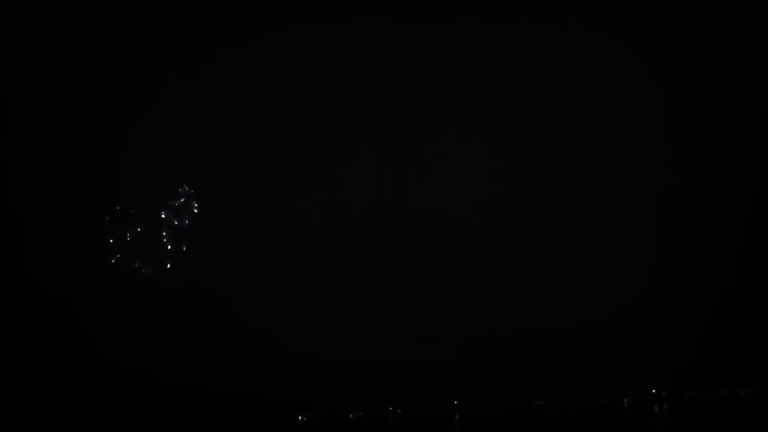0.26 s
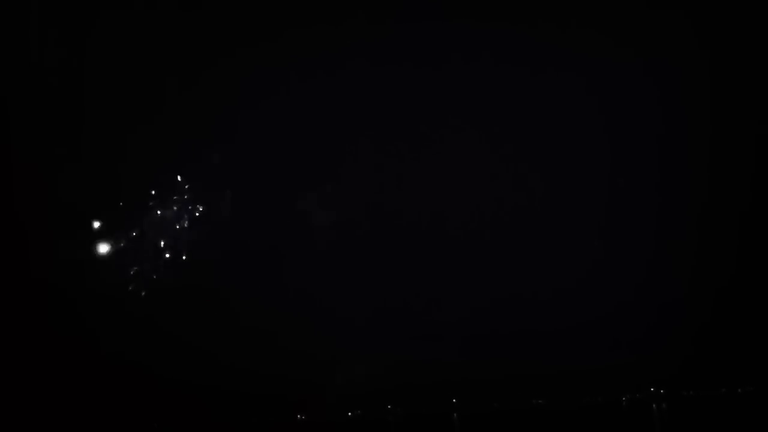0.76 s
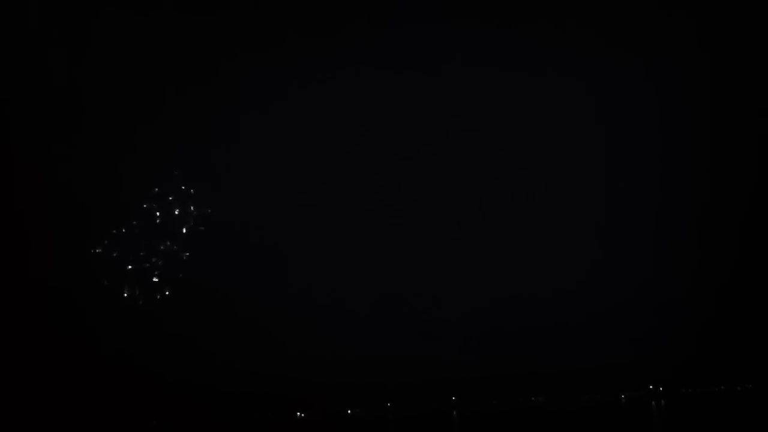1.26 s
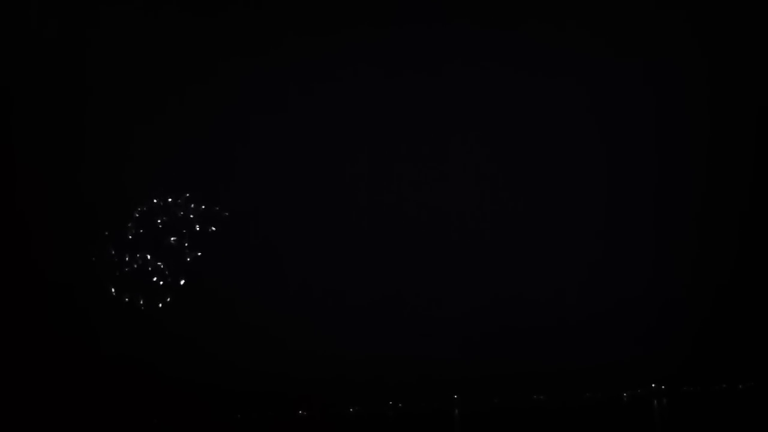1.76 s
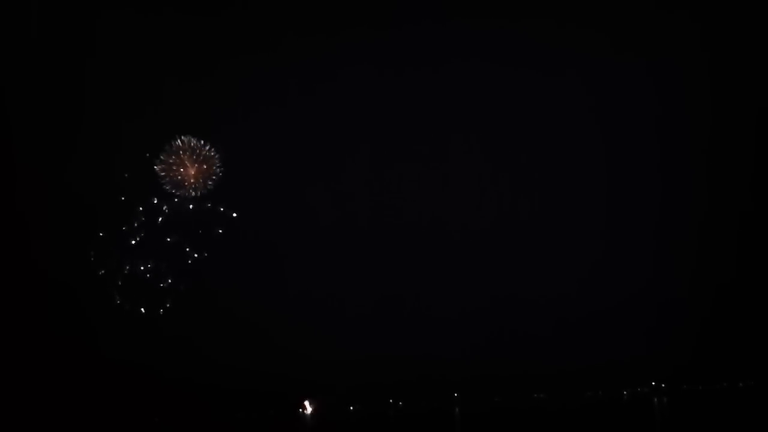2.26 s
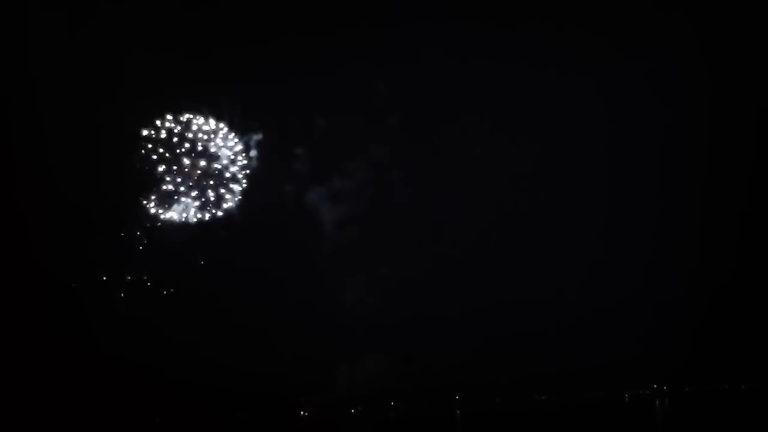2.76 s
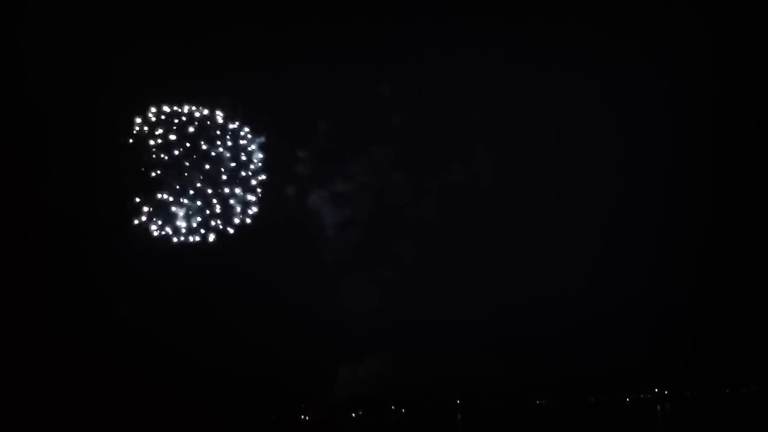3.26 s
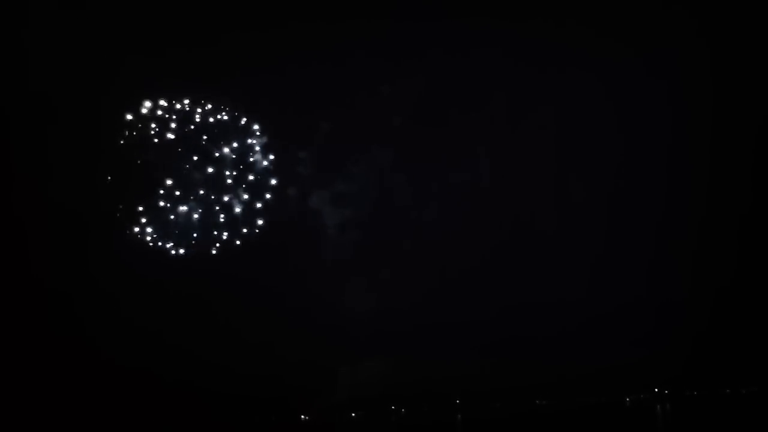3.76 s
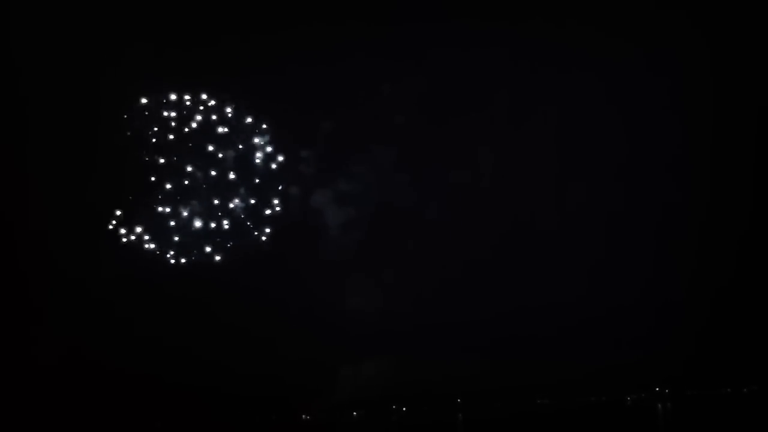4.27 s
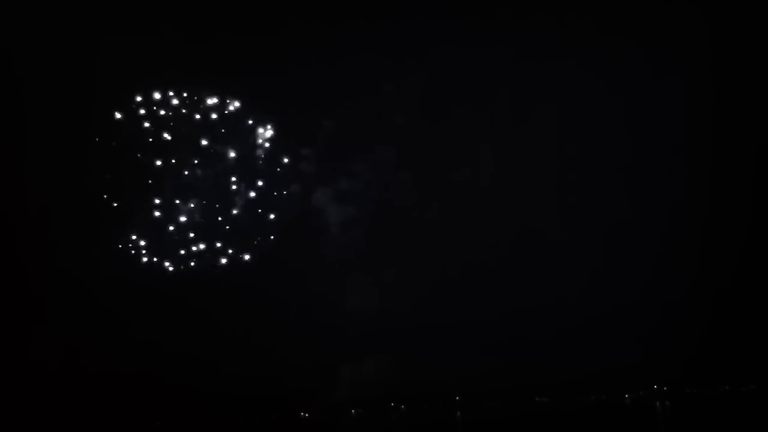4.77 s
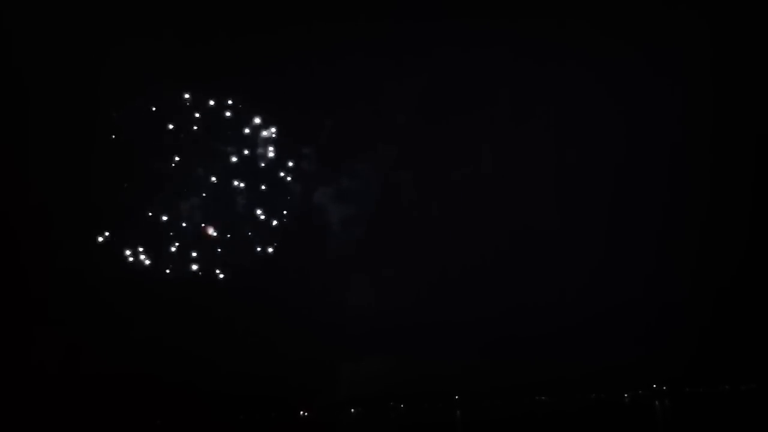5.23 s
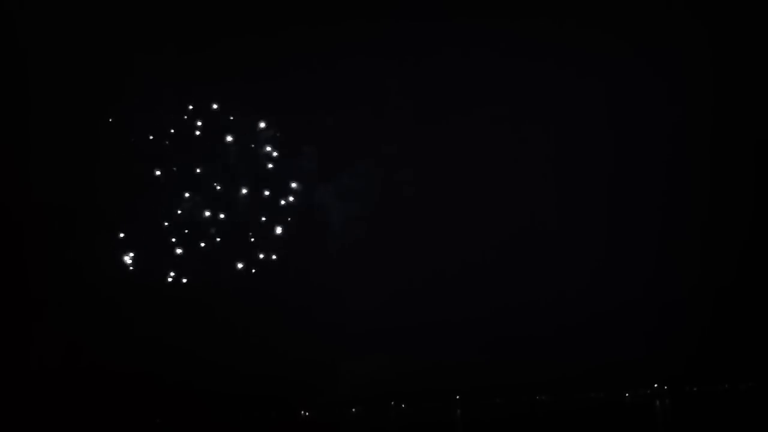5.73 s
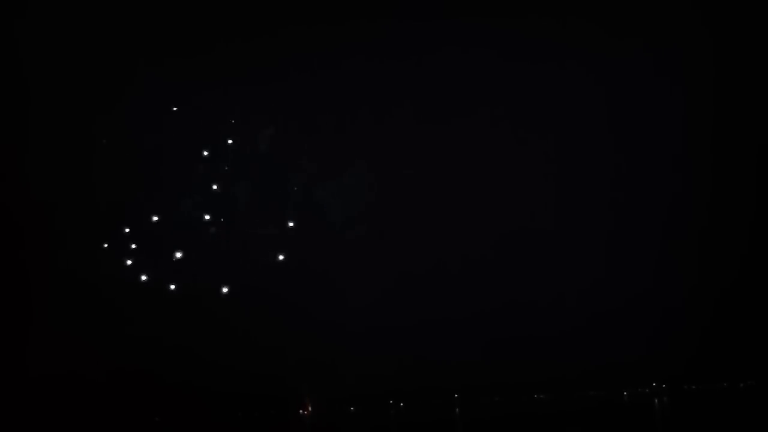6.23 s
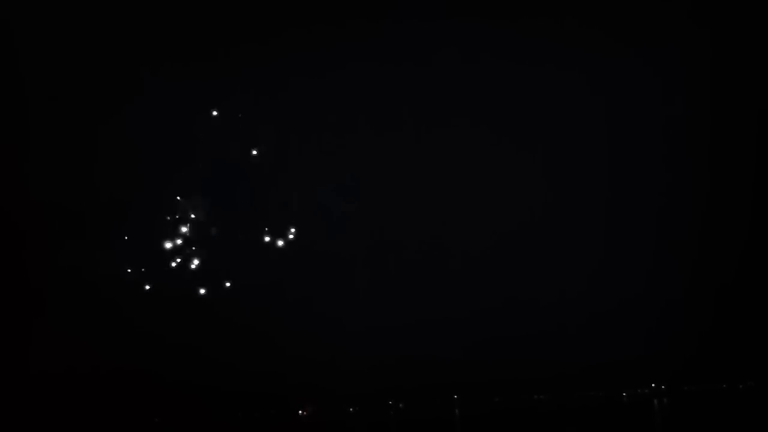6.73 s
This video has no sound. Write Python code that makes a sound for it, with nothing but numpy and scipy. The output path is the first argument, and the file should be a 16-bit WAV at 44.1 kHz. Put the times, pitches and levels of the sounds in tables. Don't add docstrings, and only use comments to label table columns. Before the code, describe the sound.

Outdoors by open water, light wind softly buffets a small stereo microphone over low far rumble and faint hiss. A deep mortar thump rolls out, followed by dry pops that bunch into a crackling flurry with grainy sizzling. Midway a thump and hard bang strike almost together and reverberate along the shore. Quiet follows with cloth brushing and small clicks, until one last muffled burst.

```python
import sys
import numpy as np
from scipy import signal
from scipy.fft import rfft, irfft, next_fast_len
from scipy.io import wavfile
from scipy.ndimage import uniform_filter1d

SR = 44100
rng = np.random.default_rng(int(sys.argv[2]) if len(sys.argv) > 2 else 0)


def linear_from_db(decibels):
    return 10 ** (np.asarray(decibels, float) / 20)


def put_to_file(sound):
    columns = np.atleast_2d(sound).T
    safe = np.clip(columns, -1, 1)
    whole_steps = np.round(safe * 32767)
    wavfile.write(sys.argv[1], SR, whole_steps.astype(np.int16))


N = 308635
T = np.arange(N) / SR


def on_log(hz, table):
    f, *columns = np.transpose(table)
    return [np.interp(np.log(hz + 1e-3), np.log(f), c) for c in columns]


def colour(x, spectrum):
    size = next_fast_len(N)
    gain = linear_from_db(on_log(np.fft.rfftfreq(size, 1 / SR), spectrum)[0])
    y = irfft(rfft(x, size) * gain, size)[..., :N]
    return y / np.sqrt(np.mean(y ** 2))


def sides(lean_db):
    return linear_from_db([[lean_db / 2], [-lean_db / 2]])


def stereo_noise(side_db, lean_db=0.):
    mid, side = rng.standard_normal((2, N))
    return (mid + linear_from_db(side_db) * side * np.array([[1], [-1]])) * sides(lean_db)


def walk(rate_hz):
    k = int(SR / rate_hz)
    held = np.repeat(rng.standard_normal(N // k + 1), k)
    return 2.6 * uniform_filter1d(uniform_filter1d(held, k), k)[:N]


def grains(hold, top):
    return np.repeat(np.minimum(rng.exponential(size=N // hold + 1), top), hold)[:N]


def swells(events, rise_db_s, fall_db_s, rest_db):
    step = 64
    t, power = T[::step], linear_from_db(rest_db) ** 2
    for s, db, hold_s, *lean_db in events:
        rise = rise_db_s * np.maximum(s - t, 0)
        fall = fall_db_s * np.maximum(t - s - hold_s, 0)
        lean = sum(lean_db) * np.array([[.5], [-.5]])
        power = power + linear_from_db(db - rise - fall + lean) ** 2
    return np.repeat(10 * np.log10(power), step, axis=1)[:, :N]


def add(out, s, sound):
    i = int(s * SR)
    out[:, i:i + sound.shape[1]] += sound[:, :N - i]


def dull(x, hz):
    a = np.exp(-2 * np.pi * hz / SR)
    return signal.lfilter([(1 - a) ** 2], [1, -2 * a, a * a], x)


def air(x, hz):
    return signal.sosfilt(signal.bessel(4, hz, fs=SR, norm="mag", output="sos"), x)


def shocks(events, returns, shape, air_hz):
    suction, refill, boom_hz, boom_db, boom_t60, swing_hz, swing_db, swing_t60 = shape
    out, t = np.zeros((2, N)), T[:SR // 8]
    boom = np.cos(2 * np.pi * boom_hz * t) * linear_from_db(boom_db - 60 * t / boom_t60)
    swing = np.sin(2 * np.pi * swing_hz * t) * linear_from_db(swing_db - 60 * t / swing_t60)
    for s, peak_db, lean_db, push_ms, *_ in events:
        r = t * 1000 / push_ms
        refilling = -suction * np.exp(-np.abs(r - 1 - suction) / refill)
        wave = np.where(r < 1 + suction, 1 - r, refilling)
        wave = air(wave + boom + swing, air_hz) * linear_from_db(peak_db)
        lean = sides(lean_db)
        add(out, s, lean * wave)
        for delay_ms, left_db, right_db, hz in returns:
            add(out, s + delay_ms / 1000, lean * linear_from_db([[left_db], [right_db]]) * dull(wave, hz))
    return out


def cracks(times, dbs, lean_db, length_s, air_hz):
    # left, right [dB]
    echo_db = [
        [-14],
        [-22],
    ]
    echo_s = 0.0214
    out, t = np.zeros((2, N)), T[:400]
    tears = rng.standard_normal((len(times), 2, len(t)))
    tears = tears[:, :1] + 0.21 * tears[:, 1:] * np.array([[1], [-1]])
    tears = np.diff(tears, prepend=0) * np.exp(-t / length_s)
    tears = air(air(tears, air_hz), air_hz) * sides(lean_db)
    for s, db, tear in zip(times, dbs, tears):
        add(out, s, linear_from_db(db) * tear)
        add(out, s + echo_s, linear_from_db(db) * linear_from_db(echo_db) * tear)
    return out


def scatter(times, dbs, spectrum, side_db, lean_db, rise_s, stretch):
    # f/Hz, build-up share [1], quick t60/s, slow t60/s, slow share/dB
    bands = [(59.4, 0.76, 0.19, 0.91, -12), (258.3, 0.635, 0.15, 0.8, -7.5), (1010, 0.27, 0.24, 1, -9.5),
             (4000, 1.2, 0.29, 1, -6.5), (11840, 3.8, 0.31, 0.53, -10)]
    step = 16
    blows = np.zeros(N // step + 1)
    np.add.at(blows, (np.array(times) * SR / step).astype(int), linear_from_db(dbs) ** 2)
    size = next_fast_len(N)
    hz = np.fft.rfftfreq(size, 1 / SR)
    whole = rfft(colour(stereo_noise(side_db, lean_db), spectrum), size)

    def fade(per_s):
        return signal.lfilter([1], [1, -linear_from_db(-120 * step * per_s / SR)], blows)

    def swell(t60, rise):
        return fade(1 / t60) - 2 * fade(1 / t60 + 1 / rise) + fade(1 / t60 + 2 / rise)

    out = 0
    for k, (_, build, quick_s, slow_s, share_db) in enumerate(bands):
        part = on_log(hz, [(row[0], j == k) for j, row in enumerate(bands)])[0]
        rise = rise_s * build
        energy = swell(quick_s * stretch, rise) + linear_from_db(share_db) ** 2 * swell(slow_s * stretch, rise)
        level = uniform_filter1d(np.repeat(np.sqrt(np.abs(energy)), step), step)[:N]
        out = out + irfft(whole * part, size)[:, :N] * level * linear_from_db(walk(40))
    return out


def blasts(events, lean_db, returns, shape, spectrum, air_hz, crack_hz, crack_s, rise_s, stretch):
    events = np.insert(events, 2, lean_db, axis=1)
    s, _, _, _, scatter_db, crack_db = np.transpose(events)
    fronts = cracks(s, crack_db, 1.4, crack_s, crack_hz)
    tail = scatter(s + 0.00035, scatter_db, spectrum, -0.32, 2.7, rise_s, stretch)
    return shocks(events, returns, shape, air_hz) + fronts + tail


def wind():
    # t/s, level/dB, hold/s, left minus right/dB
    gusts = [(0.17, -53.5, 0.46, 2.5), (1.2, -51.5, 0.43, -1.5), (2.02, -50, 0.31, -1.5),
             (3.22, -50.5, 0.32, 1.5), (3.75, -57, 0.49, -1), (4.52, -53.5, 0.05, -3.5),
             (5.22, -49.5, 0.74, 0.5), (6.15, -56.5, 0.28, -4.5)]
    # f/Hz, level/dB
    spectrum = [(2, -15.5), (5, 13.5), (18, 1), (26, -10), (40, -22.5), (80, -76)]
    db = swells(gusts, rise_db_s=72, fall_db_s=53, rest_db=-60)
    return colour(stereo_noise(-3.0), spectrum) * linear_from_db(db)


def rumble():
    # t/s, level/dB, hold/s
    rolls = [(0.01, -67.5, 0.23), (0.43, -66.5, 0.11), (1.85, -68, 0.25), (4.07, -62.5, 0.15),
             (5.25, -74.5, 0.7)]
    # f/Hz, level/dB
    spectrum = [(21, -50.5), (35, -16), (48, -4), (86, -3.5), (177, -8.5), (250, -14), (275, -16),
                (907, -35), (981, -32), (1500, -51.5), (1950, -80), (3300, -120)]
    db = swells(rolls, rise_db_s=59, fall_db_s=43, rest_db=-69.5)
    return colour(stereo_noise(-3.0), spectrum) * linear_from_db(db + 2.5 + 1.0 * walk(14))


def motor_hum():
    return np.sin(2 * np.pi * 955 * T + 1.0 * walk(26)) * linear_from_db(-98 + 2.0 * walk(4.5))


def hiss():
    # f/Hz, level/dB
    spectrum = [(710, -41), (1200, -1), (1490, -3.5), (1610, -29), (4330, -4), (5210, -4.5), (6410, -15),
                (7300, -10), (16200, -13.5)]
    return colour(stereo_noise(0), spectrum) * linear_from_db(-92)


def sizzle():
    # fully alight t/s, level/dB, burn/s
    showers = [(0.01, -81, 0.11), (0.42, -72, 0.18), (0.75, -72.5, 0.72), (1.6, -71, 0.98),
               (2.78, -66.5, 0.076), (3.2, -71, 0.22), (3.62, -70.5, 0.18), (3.95, -65, 0.19),
               (4.4, -72, 0.2), (4.75, -76, 0.14), (5.3, -83, 0.38), (5.8, -80.5, 0.13), (6.55, -86.5, 0.4)]
    # f/Hz, level/dB
    spectrum = [(150, -16.5), (250, -0.5), (343, -5), (380, -0.5), (597, -6), (881, -1.5), (1360, -6),
                (1890, -6), (2230, -11.5), (2520, -11), (3770, -16), (5650, -33.5), (9000, -52.5),
                (11700, -58.5), (19800, -120)]
    crowd_db, crackle_db, crackle_per_db = -69, 5, 1.8
    db = swells(showers, rise_db_s=34.5, fall_db_s=27.5, rest_db=-96)[0]
    spread_db = np.clip(crackle_db + crackle_per_db * (crowd_db - db), 0, 3.3)
    sizes = linear_from_db(spread_db * grains(hold=60, top=3.1))
    grain = stereo_noise(-6, 3.1) * sizes / np.sqrt(uniform_filter1d(sizes ** 2, SR // 4))
    return colour(grain, spectrum) * linear_from_db(db + 1.0 + 0.3 * walk(14))


def mortars():
    # t/s, peak/dB, push/ms, scatter/dB, crack/dB
    launches = [
        (.29323, -23.5, 1.32, -41.5, -33.5),
        (3.85565, -23.5, 0.77, -51.5, -36.5),
    ]
    # delay/ms, left/dB, right/dB, dulled above f/Hz
    returns = [(11.6, -22, -24, 860), (16, -6, -8.6, 230), (24.8, -9, -10.8, 120)]
    # suction share [1], refill/push [1], boom f/Hz, dB, t60/s, after-swing f/Hz, dB, t60/s
    shape = (.89, 2.2, 95, -6.6, .095, 205, -21, .15)
    # f/Hz, level/dB
    spectrum = [(24, -39.5), (40, -23.5), (103, 2), (141, -13.5), (228, -9.5), (766, -27.5), (907, -29.5),
                (3970, -39), (9000, -54), (14000, -82)]
    return blasts(launches, 1.8, returns, shape, spectrum, air_hz=356,
                  crack_hz=3380, crack_s=0.0037, rise_s=0.17, stretch=1.03)


def rustle():
    # t/s, level/dB, hold/s, left minus right/dB
    moves = [(0.85, -94, 0.2, -2), (1.62, -88.5, 0.15, -2), (2.81, -97, 0.02, -6), (4.1, -97.5, 0.04, 1),
             (5.29, -92, 0.03, -2), (5.375, -84, 0.04, -10), (5.53, -94.5, 0.1, -2),
             (5.68, -89.5, 0.25, -4), (6.5, -95.5, 0.24, 8)]
    # f/Hz, level/dB
    spectrum = [(1200, -27), (2000, -7), (3400, -4), (5000, -5.5), (9300, -12), (11800, -15), (12800, -26),
                (16000, -48)]
    db = swells(moves, rise_db_s=116, fall_db_s=34, rest_db=-100)
    sizes = linear_from_db(3.3 * grains(hold=70, top=3.6) + 0.69 * walk(20))
    return colour(stereo_noise(-3.5) * sizes, spectrum) * linear_from_db(db + 2.5)


def ticks_and_chinks():
    # t/s, peak/dB, centre f/Hz, left minus right/dB
    ticks = [(0.7692, -67, 8130, 3.0), (0.8544, -81, 8170, 0.5), (1.0026, -63, 8240, -6),
             (1.0782, -72, 9140, 3), (1.1563, -67, 8900, -0.5), (2.3797, -61, 13500, 1),
             (3.5823, -64, 8400, 6), (4.6154, -80, 8500, 7), (4.7461, -71, 8900, 2.0),
             (5.2816, -66, 8310, -12), (5.3238, -69, 11000, -1), (5.42, -59, 8350, 0),
             (6.7532, -61, 6500, 8)]
    # t/s, peak/dB, pitch f/Hz, left minus right/dB
    chinks = [(1.0778, -62, 1400, 3), (5.029, -65, 1800, 3), (5.2095, -77, 2800, 13),
              (5.305, -64, 3550, -14), (5.797, -72, 6030, -6), (6.159, -68, 3180, -6),
              (6.193, -81, 3550, -3), (6.323, -79, 5040, -2), (6.355, -75.5, 4840, 0),
              (6.484, -77, 4670, 2), (6.7535, -73, 4380, 10), (6.9175, -62, 1500, -0.5)]
    out, t = np.zeros((2, N)), T[:500]
    for events, ring_s, spread_hz in ((ticks, 0.00025, 6000), (chinks, 0.0016, 1200)):
        envelope = np.exp(-t / ring_s) * (1 - np.exp(-t / 0.00011))
        wobbles = rng.standard_normal((len(events), len(t)))
        for (s, peak_db, hz, lean_db), wobble in zip(events, wobbles):
            blur = 1 + dull(wobble, spread_hz) * np.sqrt(SR / spread_hz) / 2
            tick = blur * np.sin(2 * np.pi * hz * t) * envelope
            add(out, s, linear_from_db(peak_db - 1.0) * sides(lean_db) * tick)
    return out


def pops():
    # t/s, peak/dB, left minus right/dB, push/ms
    stars = [(1.441, -32.5, 4, 0.51), (1.4704, -35.5, 6.5, 0.46), (1.7312, -31.5, 4.5, 0.56),
             (1.7641, -32, 3, 0.55), (2.0824, -35, 4, 0.46), (2.1277, -31.5, 3.9, 0.5),
             (2.2316, -32, 3.5, 0.64), (2.3041, -30.5, 2.5, 0.62), (2.3139, -34, 8, 0.48),
             (2.6064, -32.5, 4.1, 0.57), (2.6173, -29.5, 4, 0.58), (2.709, -33, 2, 0.56),
             (2.759, -32.5, 3.5, 0.67), (2.7813, -34.5, 7, 0.81), (2.784, -33, 3, 0.51),
             (2.7932, -34.5, 0, 0.56), (2.8063, -30.5, 5, 0.66), (2.8495, -31, 4, 0.39),
             (2.8537, -30.5, 6, 0.56), (2.858, -33, 1, 0.79), (2.8911, -29.0, 3, 0.5),
             (3.0084, -32, 4.3, 0.43), (3.0526, -33.5, 4.5, 0.5), (3.1286, -31.5, 3, 0.63)]
    # delay/ms, left/dB, right/dB, dulled above f/Hz
    returns = [(1.05, -11, -20, 6000), (1.87, -1.1, -2.9, 380)]
    # suction share [1], refill/push [1], boom f/Hz, dB, t60/s, after-swing f/Hz, dB, t60/s
    shape = (.58, .66, 100, -80, .05, 300, -80, .05)
    # f/Hz, level/dB
    spectrum = [(88, -19), (150, 1.5), (551, 5), (1020, -0.5), (1460, -11), (1860, -14), (3630, -23),
                (6610, -39.5), (9000, -78), (11700, -77), (19800, -120)]
    s, peak_db = np.transpose(stars)[:2]
    direct = shocks(stars, returns, shape, air_hz=2100) * linear_from_db(3.0)
    fronts = cracks(s, peak_db - 5, 2.0, 0.00093, 3620)
    return direct + fronts + scatter(s + 0.00067, peak_db - 22.0, spectrum, -0.5, 3.5, 0.0045, 0.8)


def near_shell():
    # t/s, peak/dB, push/ms, scatter/dB, crack/dB
    bursts = [
        (3.88417, -19, 0.917, -36.5, -41.5),
    ]
    # delay/ms, left/dB, right/dB, dulled above f/Hz
    returns = [(2.21, -9, -12, 5700), (9.17, -13, -9, 420), (21.4, -16, -26, 4500)]
    # suction share [1], refill/push [1], boom f/Hz, dB, t60/s, after-swing f/Hz, dB, t60/s
    shape = (1.54, .44, 78, -4.3, .069, 249, -4.2, .061)
    # f/Hz, level/dB
    spectrum = [(24, -33.5), (40, -2), (96, -5), (151, -5.5), (433, -9.5), (585, -17), (1120, -20),
                (1440, -25.5), (4930, -34.5), (8990, -45), (16000, -67)]
    return blasts(bursts, 3.2, returns, shape, spectrum, air_hz=6600,
                  crack_hz=14500, crack_s=0.00028, rise_s=0.0213, stretch=1.09)


def far_shell():
    # t/s, peak/dB, push/ms, scatter/dB, crack/dB
    bursts = [
        (6.92832, -22.5, .95, -46.5, -66),
    ]
    # delay/ms, left/dB, right/dB, dulled above f/Hz
    returns = [(2.37, -6.6, -9.4, 1100), (7.18, -20, -15.4, 1500)]
    # suction share [1], refill/push [1], boom f/Hz, dB, t60/s, after-swing f/Hz, dB, t60/s
    shape = (.76, .66, 98, -14, .061, 354, -13, .018)
    # f/Hz, level/dB
    spectrum = [(35, -39), (60, -5), (177, -1), (416, -1.5), (520, -4.5), (1310, -14), (1470, -22),
                (3940, -25), (13000, -60)]
    return blasts(bursts, 2.4, returns, shape, spectrum, air_hz=3900,
                  crack_hz=6800, crack_s=0.0012, rise_s=0.0064, stretch=1.9)


def scene():
    night = wind() + rumble() + motor_hum() + hiss()
    close_by = rustle() + ticks_and_chinks()
    fireworks = sizzle() + mortars() + pops() + near_shell() + far_shell()
    return night + close_by + fireworks


def band_limit(x):
    return signal.sosfilt(signal.butter(12, 15750, fs=SR, output="sos"), x)


def record(dry):
    return band_limit(dry)


dry = scene()
out = record(dry)
put_to_file(out)
```